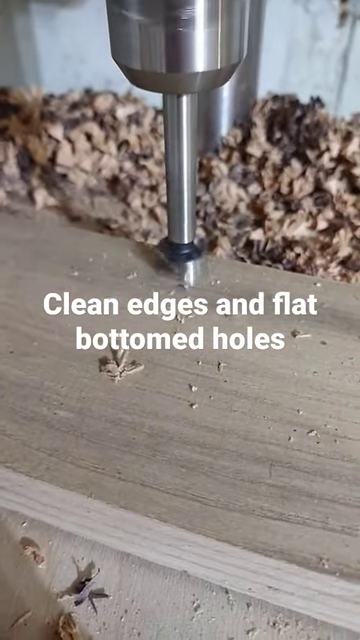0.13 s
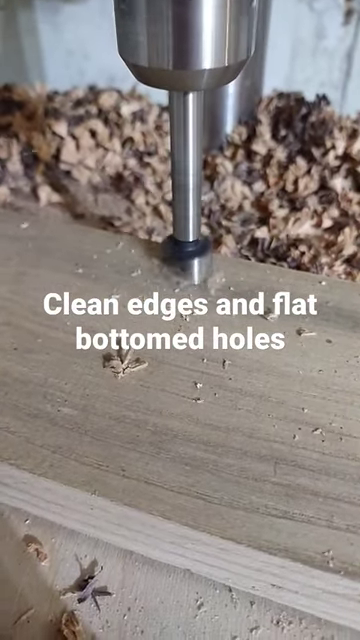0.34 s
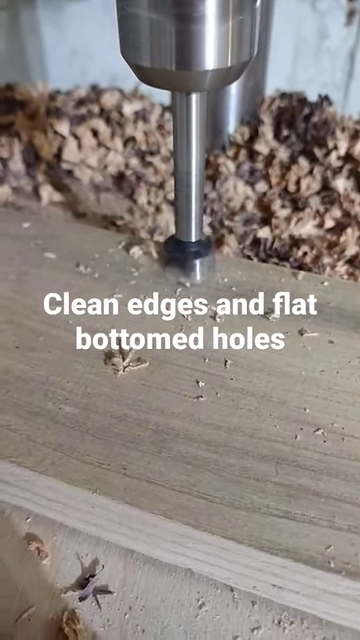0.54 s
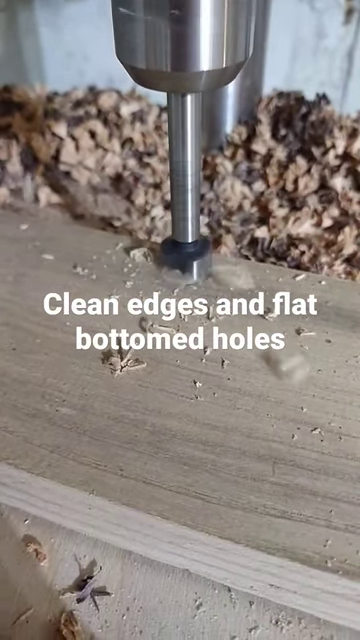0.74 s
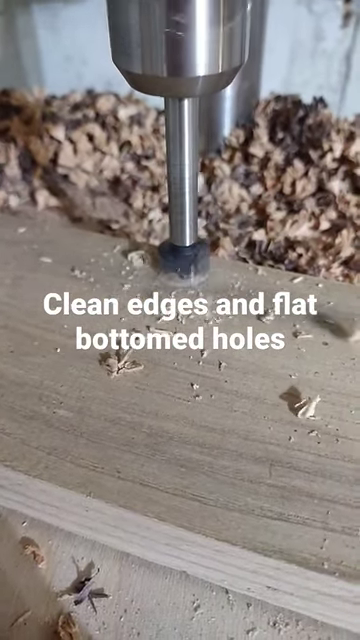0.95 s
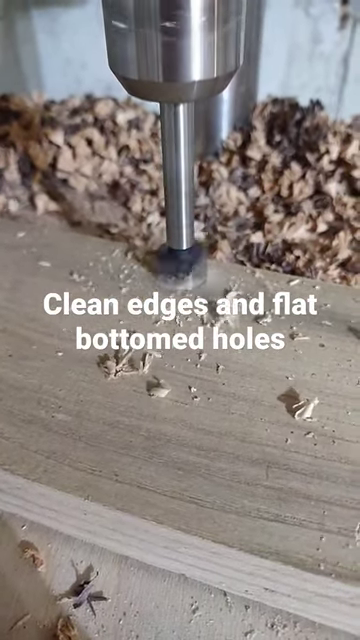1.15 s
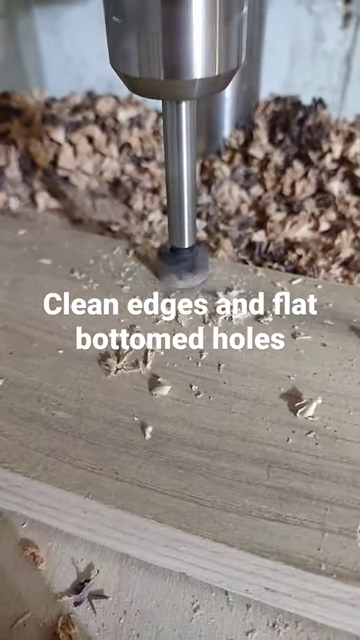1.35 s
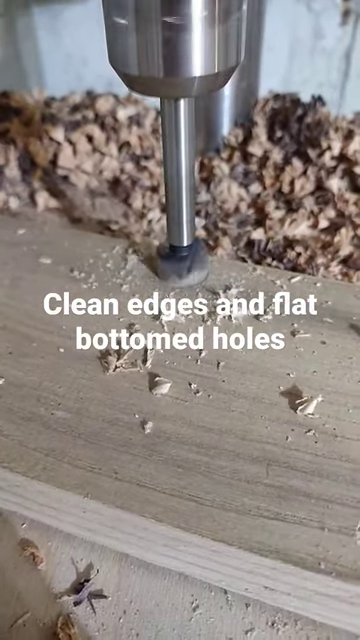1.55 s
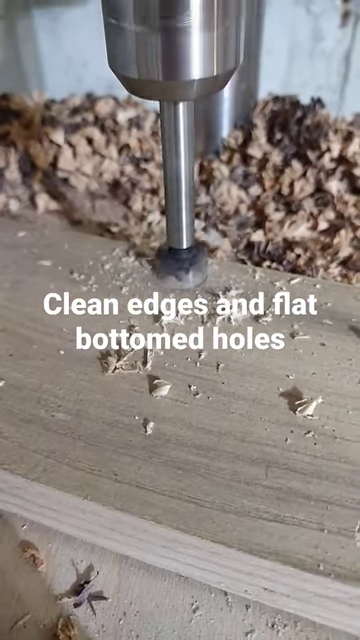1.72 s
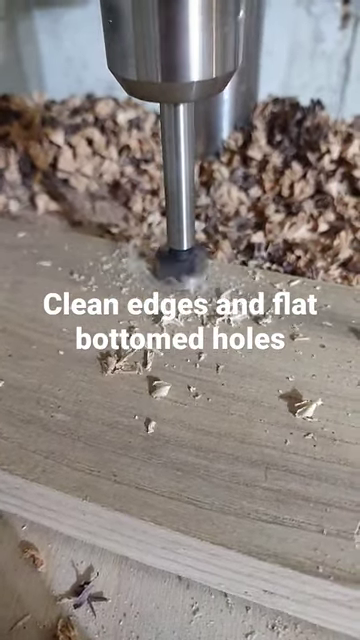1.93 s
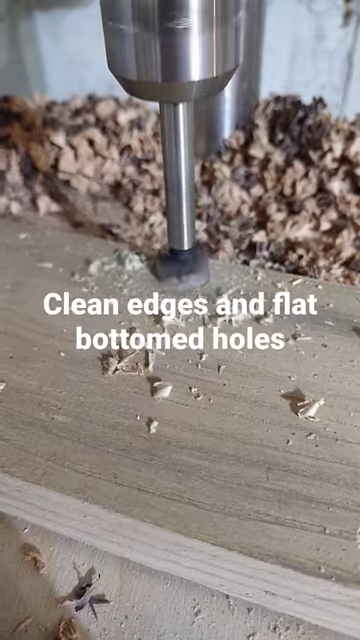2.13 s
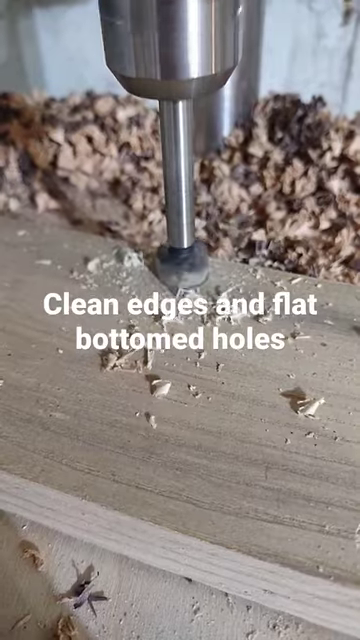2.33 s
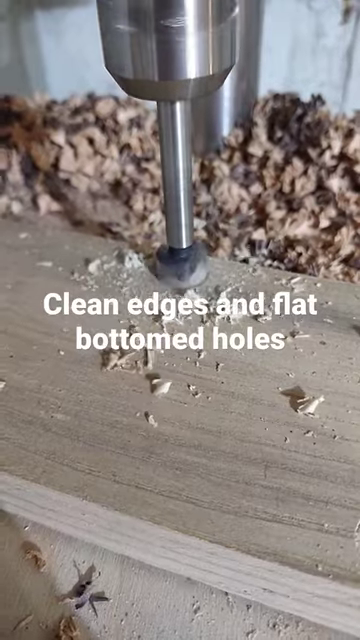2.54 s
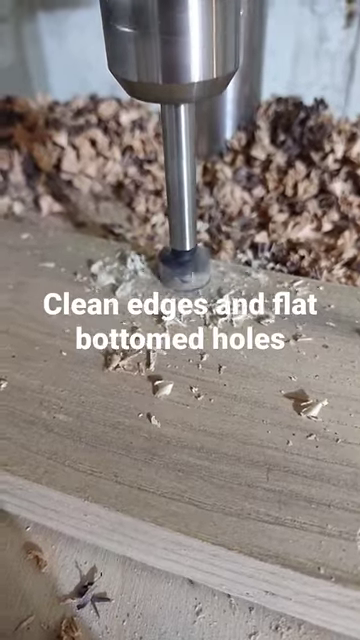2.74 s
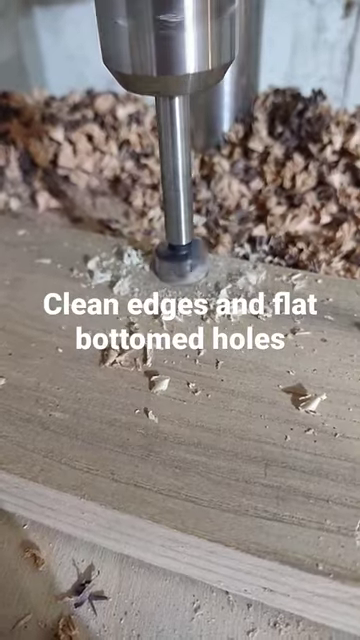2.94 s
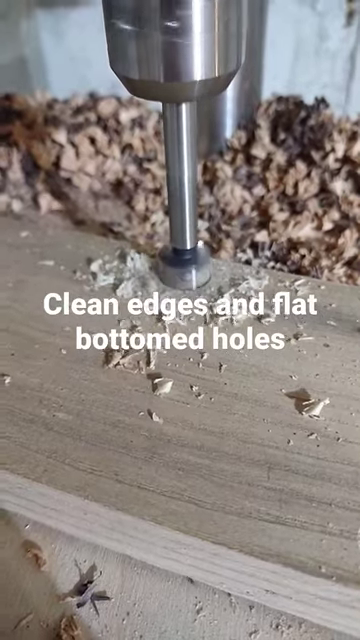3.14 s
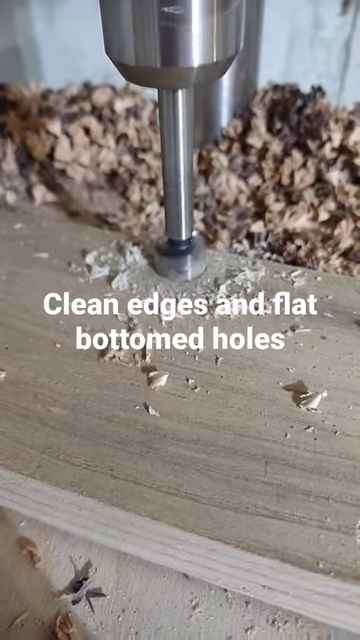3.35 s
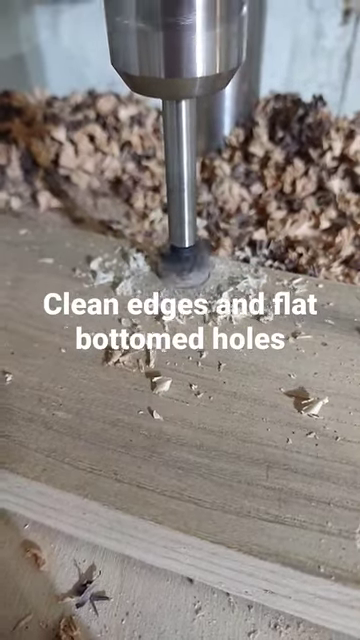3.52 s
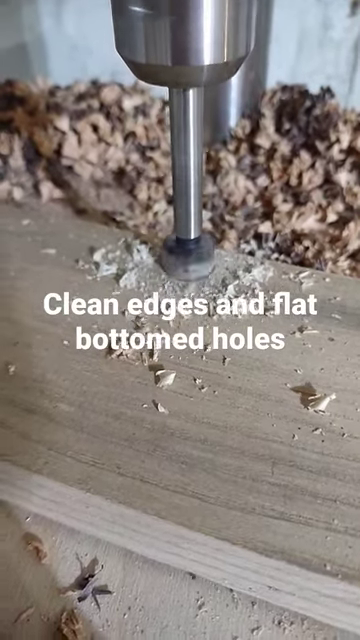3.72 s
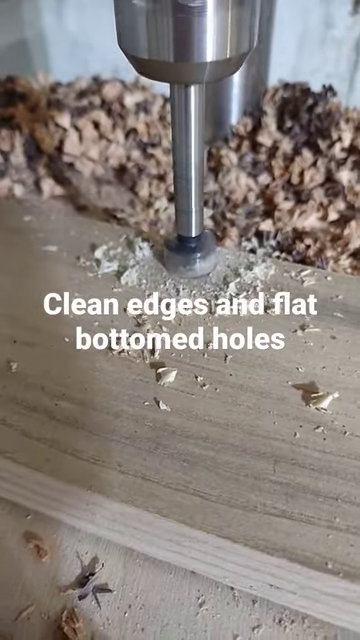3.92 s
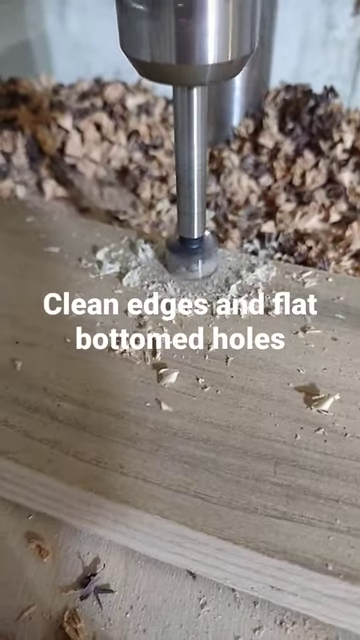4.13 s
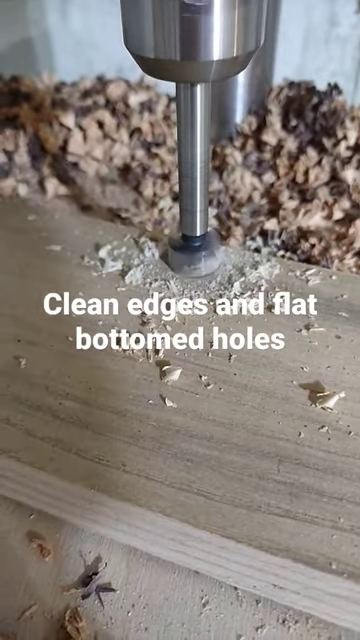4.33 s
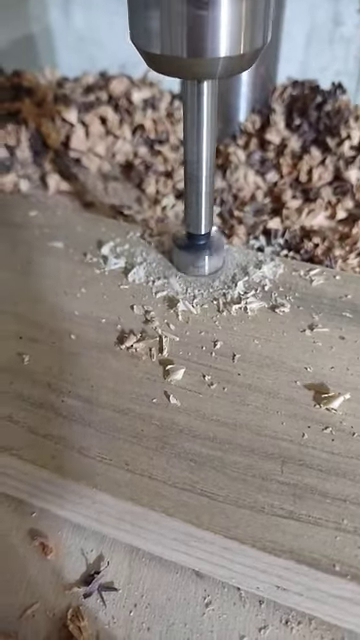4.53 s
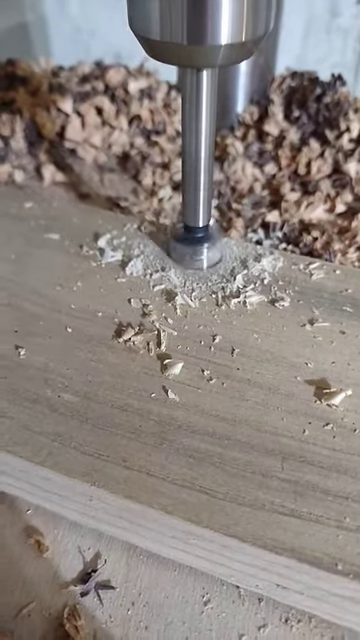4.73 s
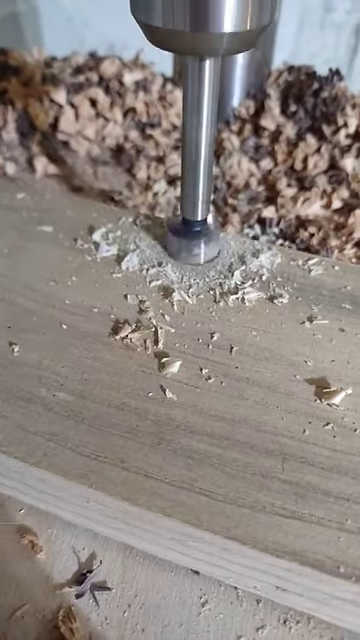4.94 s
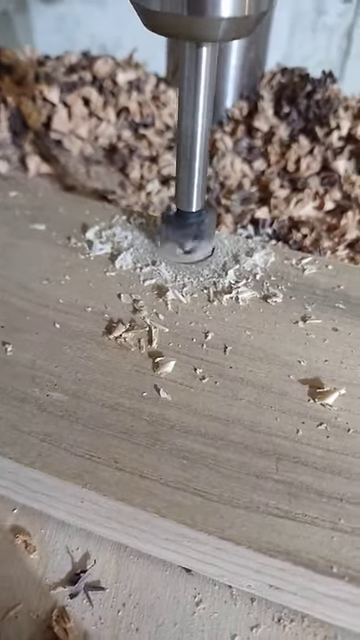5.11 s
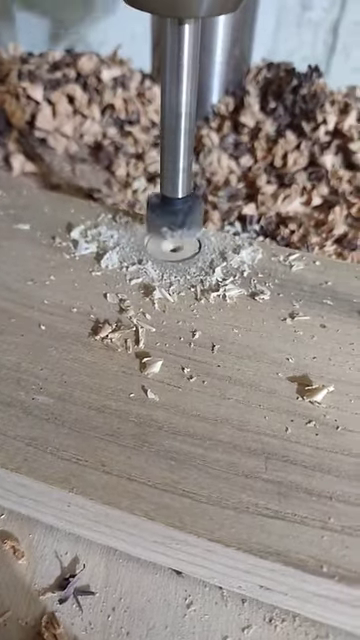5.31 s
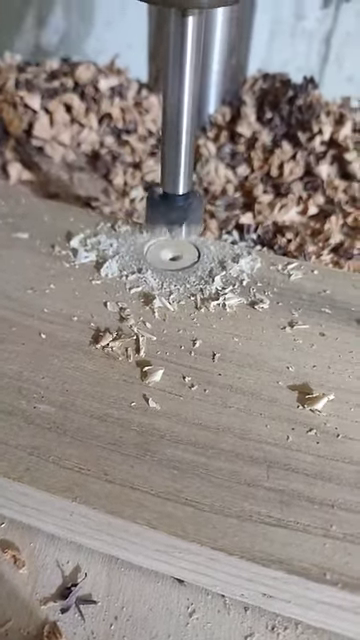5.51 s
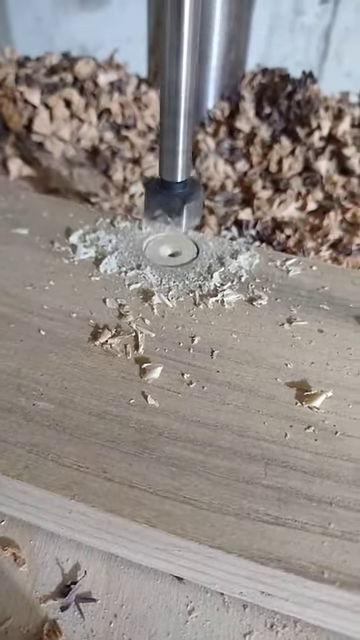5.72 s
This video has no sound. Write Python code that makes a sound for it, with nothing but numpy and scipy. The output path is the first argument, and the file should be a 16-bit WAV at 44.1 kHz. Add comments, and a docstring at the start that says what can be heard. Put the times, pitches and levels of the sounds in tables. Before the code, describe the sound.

Close to the microphone, a spinning drill bit bites into wood, scraping in rapid, even pulses over a vibrating drone. The steel rings and squeals more steadily as it sinks in. Near the end the whine dips in pitch and cuts off as the bit withdraws, leaving the softer hum of the idling drill press, light ticks of chips and a short clunk, with little echo from the workshop.

```python
"""A close, throbbing thrum and rasp: a drill press bores a flat-bottomed hole in a board, in a workshop.
At about 12 turns a second, the feed force thrums through the table and the edge rasps across end grain
twice a turn. The rim rubs the wall and rings the shank, squealing more as the hole deepens.
Near 5 s the bit lifts: the motor idles, loose chips tick and play in the feed knocks the housing."""
import sys
import numpy as np
from scipy import signal
from scipy.fft import rfft, irfft
from scipy.io import wavfile
from scipy.ndimage import uniform_filter1d, map_coordinates

SR = 44100
rng = np.random.default_rng(int(sys.argv[2]) if len(sys.argv) > 2 else 0)


def store_pcm(level_fs):
    """Save levels as 16-bit WAV."""
    pcm = np.round(np.clip(level_fs, -1, 1) * 32767).astype(np.int16)
    wavfile.write(sys.argv[1], SR, np.atleast_2d(pcm).T)


N = 254445
T = np.arange(N) / SR
HZ = np.fft.rfftfreq(N, 1 / SR)

# spindle speed, sagging under load: time_s, turns_per_s
SPINDLE_SPEED = [(0.0, 12.205), (0.5, 12.192), (0.9, 12.155), (1.6, 12.241), (2.6, 12.265), (3.4, 12.298),
                 (4.7, 12.306), (5.2, 12.35)]
# feed force harmonics, bit entering and deep: spindle_order, level_db
FORCE_ENTERING = [(1, -46), (2, -48), (3, -39), (4, -33), (5, -32), (6, -15), (7, -18.5), (8, -18),
                  (9, -33), (10, -10.5), (11, -13), (12, -5), (13, -7.5), (14, 1), (15, -18), (16, -10.5),
                  (17, -16.5), (18, -51)]
FORCE_DEEP = [(1, -36), (2, -45), (3, -40), (4, -28), (5, -43), (6, -13.5), (7, -26), (8, -2), (9, -0.5),
              (10, -6), (11, -11), (12, -1.5), (13, -9.5), (14, 0), (15, -57), (16, -10.5), (17, -41),
              (18, -28)]
# resonances of shank, cutting head, edge, board, steel table: freq_hz, width_hz, entering_db, deep_db
SHANK_MODES = [(1962, 104, -4.5, -6), (2153, 143, 0.5, -0.5), (2215, 69, -3.5, -4.5), (2315, 61, -3.5, -10),
               (2378, 423, -13.5, -13.5)]
HEAD_MODES = [(3190, 258, -0.5, -1.5), (3563, 360, -3.5, -3), (4006, 270, -0.5, -5),
              (4350, 420, -13, -15.5), (4757, 315, -8.5, -10.5), (5606, 685, -11.5, -12),
              (5860, 582, -12.5, -30), (7050, 140, -29, -24), (7830, 930, -20.5, -23.5),
              (8830, 490, -21, -23), (9970, 920, -24.5, -27.5), (10780, 7500, -27, -33),
              (11150, 590, -20, -25.5), (12500, 460, -24, -26), (13282, 643, -26, -27),
              (14363, 478, -24, -27), (15029, 890, -23, -27)]
SQUEAK_MODES = [(8980, 300, -2, 2), (10500, 600, 0, -2.5), (12750, 400, -1, -2), (14700, 900, -5, -6)]
BOARD_MODES = [(1120, 148, -11.5, -7), (1460, 220, -15.5, -13.5), (1608, 59, -15, -20)]
TABLE_MODES = [(364, 33, -13, -12), (424.3, 93, -1.5, -6), (596.5, 115, -10, -7.5),
               (752, 115, -18.5, -12.5)]
# where the edge bites end grain and the rim rubs the wall: angle_turns, width_turns, entering_db, deep_db
EDGE_BITES = [(0.081, 0.07, 9, 5), (0.593, 0.074, 9, 2.5), (0.53, 0.028, -1.5, 4)]
RIM_RUBS = [(.08, 0.14, 8, 7), (.36, 0.062, 3.5, 3), (.52, 0.045, 6.5, 9.5), (0.622, 0.066, 9.5, 4.5),
            (.8, 0.044, 3, 8), (.89, 0.049, 4, 2)]
# feed knocks as the spindle rises: start_s, level_db
FEED_KNOCKS = [(5.161, -28.5), (5.6428, -18.5), (5.647, -17.5), (5.663, -21)]
# housing resonances: freq_hz, level_db, t60_s
HOUSING_MODES = [(376, 6, 0.18), (451, 5, 0.19), (606, 3, 0.14), (1125, -1.5, 0.14), (1293, -0.5, 0.19),
                 (1660, -12, .08), (2010, -11, .08), (2340, -12, .06), (3386, -24, .06)]
# spectrum of a knock's crack: freq_hz, level_db
CRACK_SPECTRUM = [(40, -40), (150, -13), (450, 10), (900, -14), (1500, 4), (3000, -13), (5000, -28),
                  (7000, -40), (15000, -49)]
# chips flicked off the bit: start_s, level_db, t60_s
CHIP_TICKS = [(1.745, -33, 0.022), (5.372, -48, .15), (5.44, -47, .15), (5.52, -47, .04),
              (5.539, -27, 0.066), (5.577, -28, 0.018)]
# spectrum of a chip's tick: freq_hz, level_db
CHIP_SPECTRUM = [(300, -24), (1200, 2.5), (2600, 0), (4000, -15), (7000, -20), (15000, -19)]
# motor hum: pitch_hz, level_db
HUM_TONES = [(120, -36), (171, -40.5), (240.3, -36), (360.5, -45.5), (393, -41.5), (571, -44.5), (980, -49),
             (1970, -51.5), (2090, -60), (2449, -56), (4640, -77)]
# spectrum of belt and bearings: freq_hz, level_db
RUMBLE_SPECTRUM = [(30, -28), (75, -14), (110, 0), (135, -14.5), (165, 3.5), (215, -2.5), (280, -7),
                   (390, 1), (500, -12), (600, -7), (900, -19.5), (1150, -13), (1800, -22.5), (2900, -27.5),
                   (3500, -43), (4300, -40), (6500, -52), (15500, -54)]
# rumble swells as the spindle rises: centre_s, sigma_s, gain_db
RUMBLE_SWELLS = [(5.37, 0.015, 2.5), (5.76, .04, 3)]

# voices of the cut: entering_db, rim_in_db, buried_db, stage_lag_s, db_per_pressure_db
THRUM_LEVEL = (-16.7, -20.5, -24, 0.15, 1.02)
WHINE_LEVEL = (-19, -21.2, -18.2, -0.44, 0.95)
RASP_LEVEL = (-23, -26.8, -25.3, -0.06, 0.99)
TABLE_LEVEL = (-23.6, -24.3, -25.5, 0.3, 0.72)
BOARD_LEVEL = (-26, -28, -25.5, 0.17, 1.15)
SQUEAK_LEVEL = (-46, -44, -47.5, 0, 3)

TOUCH_DB, PRESS_S, EASE_S, EASE_DB_PER_S = 11, 0.5, 4.85, 68  # hand on the feed
RIM_IN_S, RIM_FADE_S, BURIED_S, BURIED_FADE_S = 1.41, 0.29, 3.38, 0.35  # stages of the hole
OFF_FLOOR_S, OFF_WALL_S, OFF_CHIPS_S = 4.99, 5.068, 5.185  # bit withdraws


def thrum(turns, depth, push_turns=0.4514, throb_db=4.8, seating_s=0.6):
    """The uneven floor of the hole pushes the table in the same pattern every turn."""
    force = np.zeros(N, complex)
    angle_turns = turns - push_turns
    touch_db = np.maximum(pressure_db(), -TOUCH_DB)
    for (order, entering_db), (_, deep_db) in zip(FORCE_ENTERING, FORCE_DEEP):
        # bending waves disperse, smearing each push
        lag_cycles = 0.018 * (order - 12) ** 2 + 0.15 * rng.standard_normal() + 0.022 * wander(2.1)
        size = blend(gain_of(entering_db), gain_of(deep_db), depth)
        size *= gain_of(0.16 * (order - 10) * touch_db)  # a light touch favours low orders
        size *= 1 + 0.19 * wander(4.2)
        force += size * np.exp(2j * np.pi * (order * angle_turns + lag_cycles))
    # wood yields to the hardest pushes
    force = force.real / uniform_filter1d(abs(force) + 1e-6, size=700) ** 0.37
    # on entry the rim bears on one side: one throb a turn
    force *= gain_of(throb_db * np.exp(-T / seating_s) * np.cos(2 * np.pi * angle_turns))
    return levelled(force) * gain_of(voice_db(THRUM_LEVEL)) * until(OFF_FLOOR_S, 0.05)


def whine(turns, depth, squeal_hz=2165, squeal_share=0.8):
    """The rim sticks and slips on the wall and rings the shank; with depth it locks into a squeal."""
    force = gain_of(at_angles(turns, RIM_RUBS, depth) + 1.1 * roughness(turns, memory=0.95, points=24))
    friction = roughness(turns, memory=0.63, points=3600) * force
    shank = levelled(ring(friction, SHANK_MODES, depth))
    pitch_hz = squeal_hz * (1 + 0.007 * roughness(turns, memory=0.8, points=12))
    squeal = unit_rms(force * np.sin(2 * np.pi * np.cumsum(pitch_hz) / SR))
    steel = levelled(shank + squeal_share * depth * squeal)
    return steel * gain_of(voice_db(WHINE_LEVEL)) * until(OFF_WALL_S, 0.012)


def rasp(turns, depth, bite_db, snaps_per_s=1500, fizz_hz=6400):
    """Fibres scrape and snap at the edge, most across end grain; a light touch sounds duller."""
    snaps = (rng.random(N) < snaps_per_s / SR) * rng.choice([-1, 1], N)
    snaps = snaps * gain_of(3.2 * np.minimum(rng.exponential(1, N), 4))
    tearing = roughness(turns, memory=0.55, points=7200) + 0.5 * unit_rms(snaps)
    tearing *= gain_of(bite_db + 1.14 * roughness(turns, memory=0.98, points=36))
    scrape = cutting_head(tearing, depth)
    level_db = voice_db(RASP_LEVEL)
    fizz = signal.sosfiltfilt(signal.butter(6, fizz_hz, "high", fs=SR, output="sos"), scrape)
    fizz_db = 0.25 * np.minimum(level_db + 20, 0) + 1.13 * roughness(turns, memory=0.89, points=14)
    return (scrape + fizz * (gain_of(fizz_db) - 1)) * gain_of(level_db) * rim_contact()


def cutting_head(force, depth, free_width_ratio=0.61):
    """Wood damps the head; under a light touch it rings more freely."""
    lightness = np.clip(-pressure_db() / TOUCH_DB, 0, 1)
    free_modes = [(hz, width_hz * free_width_ratio, *levels) for hz, width_hz, *levels in HEAD_MODES]
    return levelled(blend(ring(force, HEAD_MODES, depth), ring(force, free_modes, depth), lightness))


def rim_contact(graze_db=-12):
    """The rim leaves the wall, then briefly grazes loose chips."""
    leave_s = OFF_WALL_S - 0.008
    graze = until(OFF_CHIPS_S, 0.01) - until(leave_s, 0.011)
    return until(leave_s, 0.0082) + gain_of(graze_db) * graze


def chop(first=1.48, steady=0.63, peak_s=0.46, settle_s=0.35):
    """Bite strength: hardest as the edge breaks the surface, then even shaving."""
    settling = np.exp(-np.maximum(T - peak_s, 0) / settle_s)
    return np.minimum(T / peak_s, 1) ** 1.5 * blend(steady, first, settling)


def pitch_sag(steel, fraction, centre_s=4.95, fade_s=0.071):
    """The steel's pitch drops as pressure comes off the bit."""
    lag_samples = np.cumsum(fraction * (1 - until(centre_s, fade_s)))
    return map_coordinates(steel, [np.arange(N) - lag_samples], order=3)


def table_growl(turns, depth, catch_s=1.16, catch_db=3.5):
    """The edge bumps over fibres and rings the table, most as the rim first catches."""
    bumps = roughness(turns, memory=0.64, points=900)
    bumps *= gain_of(1.83 * roughness(turns, memory=0.75, points=40))
    level_db = voice_db(TABLE_LEVEL) + catch_db * swell(catch_s, 0.19)
    return levelled(ring(bumps, TABLE_MODES, depth)) * gain_of(level_db) * until(OFF_WALL_S, 0.048)


def board_knocks(turns, depth, bite_db, ridge_turns=0.576, hard_grain_s=2.35):
    """Bites knock the board; once the rim is in, a ridge jolts the edge each turn, most in hard grain."""
    hard_grain = swell(hard_grain_s, 0.3)
    jolt_db = staged(0, 5, 5) + 5.5 * hard_grain
    force_db = 0.76 * bite_db + jolt_db * pulse(turns, ridge_turns, 0.039)
    bumps = roughness(turns, memory=0.59, points=1800)
    bumps *= gain_of(force_db + 0.89 * roughness(turns, memory=0.98, points=40))
    level_db = voice_db(BOARD_LEVEL) + 2.5 * hard_grain
    return levelled(ring(bumps, BOARD_MODES, depth)) * gain_of(level_db) * until(OFF_FLOOR_S, 0.068)


def squeaks(turns, depth):
    """The edge squeaks thinly on burnished fibres at the height of each bite."""
    force_db = 18 * at_angles(turns, [(0.115, 0.065, 1, 0.78), (0.59, 0.07, 0.57, 0.82)], depth)
    friction = rng.standard_normal(N) * gain_of(force_db)
    return levelled(ring(friction, SQUEAK_MODES, depth)) * gain_of(voice_db(SQUEAK_LEVEL))


def feed_knocks(crack_db=-3, ring_db=-8, low_cut_hz=230):
    """Play in the feed knocks the housing: a short crack and its ring, with little bass."""
    cracks = sum(gain_of(db) * burst(start_s, t60_s=0.1) for start_s, db in FEED_KNOCKS)
    out = gain_of(crack_db) * coloured(cracks, CRACK_SPECTRUM)
    t = T[:SR // 2]
    for start_s, knock_db in FEED_KNOCKS:
        housing = sum(gain_of(db - 60 * t / t60_s) * np.sin(2 * np.pi * hz * t) * rng.choice([-1, 1])
                      for hz, db, t60_s in HOUSING_MODES)
        part = out[round(start_s * SR):][:len(t)]
        part += gain_of(knock_db + ring_db) * housing[:len(part)]
    return signal.sosfilt(signal.butter(2, low_cut_hz, "high", fs=SR, output="sos"), out)


def chips():
    """Loose chips tick against the board."""
    ticks = sum(gain_of(db) * burst(start_s, t60_s) for start_s, db, t60_s in CHIP_TICKS)
    return coloured(ticks, CHIP_SPECTRUM)


def motor(turns, rumble_db=-29):
    """Mains hum and steady tones over the fluttering rumble of belt and bearings."""
    hum = np.zeros(N)
    for hz, db in HUM_TONES:
        amplitude = np.sqrt(2) * gain_of(db + 0.52 * wander(3))
        hum += amplitude * np.sin(2 * np.pi * hz * T + 0.18 * wander(3))
    flutter = roughness(turns, memory=0.67, points=7200) * gain_of(0.46 * wander(57))
    swell_db = sum(db * swell(centre_s, sigma_s) for centre_s, sigma_s, db in RUMBLE_SWELLS)
    return hum + levelled(coloured(flutter, RUMBLE_SPECTRUM)) * gain_of(rumble_db + swell_db)


def workshop(x, t60_s=0.13, wet_db=-15.5):
    """Nearby walls add a short tail."""
    t = T[:SR // 2]
    tail = rng.standard_normal(len(t)) * gain_of(-60 * t / t60_s) * (t > 0.003)
    return x + gain_of(wet_db) * signal.fftconvolve(x, tail / np.linalg.norm(tail))[:N]


def pressure_db():
    """Feed pressure: builds, holds at 0 dB, is let off."""
    return -TOUCH_DB * np.maximum(1 - T / PRESS_S, 0) ** 1.56 - EASE_DB_PER_S * np.maximum(T - EASE_S, 0)


def staged(entering, rim_in, buried, lag_s=0):
    """Glides between three values as the rim, then the whole head, sinks in."""
    return (entering + (rim_in - entering) * (1 - until(RIM_IN_S + lag_s, RIM_FADE_S))
            + (buried - rim_in) * (1 - until(BURIED_S + lag_s, BURIED_FADE_S)))


def hole_depth(lag_s=0):
    """0 entering, 1 buried."""
    return np.clip(staged(0, 0.68, 1, lag_s), 0, 1)


def voice_db(level):
    """A voice follows hole stage and feed pressure."""
    *stages_db, lag_s, db_per_pressure_db = level
    return staged(*stages_db, lag_s) + db_per_pressure_db * pressure_db()


def roughness(turns, memory, points):
    """Random surface, `points` per turn; each pass leaves the share `memory` for the next."""
    fresh = rng.standard_normal((int(turns[-1]) + 40, points))
    surface = signal.lfilter([np.sqrt(1 - memory ** 2)], [1, -memory], fresh, axis=0)[30:].ravel()
    return unit_rms(np.interp(turns * points, np.arange(len(surface)), surface))


def pulse(turns, angle_turns, width_turns):
    """One Gaussian hump a turn."""
    offset_turns = (turns - angle_turns + 0.5) % 1 - 0.5
    return np.exp(-(offset_turns / width_turns) ** 2 / 2)


def at_angles(turns, spots, depth):
    """Humps at fixed angles of each turn; heights shift with depth."""
    return sum(blend(entering, deep, depth) * pulse(turns, angle, width)
               for angle, width, entering, deep in spots)


def ring(force, modes, depth, size=8192):
    """Minimum-phase resonances whose strengths shift with depth."""
    hz, width_hz, *stages_db = np.transpose(modes)
    detune = 2 * (np.fft.rfftfreq(size, 1 / SR)[:, None] - hz) / width_hz
    peaks = 1 / (1 + detune ** 2) ** 2
    stages = []
    for db in stages_db:
        cepstrum = irfft(np.log(peaks @ gain_of(db) ** 2 + 1e-12))[:size // 2]
        impulse = irfft(np.exp(rfft(cepstrum, size) - cepstrum[0] / 2))
        stages.append(unit_rms(signal.oaconvolve(force, impulse)[:N]))
    return blend(*stages, depth)


def coloured(x, spectrum):
    """Filters by a spectral shape at unit RMS gain."""
    hz, db = np.transpose(spectrum)
    gain = gain_of(np.interp(np.log(HZ + 1), np.log(hz + 1), db))
    return irfft(rfft(x) * unit_rms(gain), N)


def wander(rate_hz, size=4096):
    """Random drift, unit RMS."""
    low_pass = np.exp(-(np.fft.rfftfreq(size, T[-1] / size) / rate_hz) ** 2)
    drift = irfft(rfft(rng.standard_normal(size)) * low_pass)
    return unit_rms(np.interp(T, np.linspace(0, T[-1], size), drift))


def levelled(x):
    """Unit power over about two turns; keeps the throb within each."""
    return x / np.sqrt(uniform_filter1d(x ** 2, size=7200) + 1e-12)


def burst(start_s, t60_s):
    return rng.standard_normal(N) * (T >= start_s) * gain_of(-60 * np.maximum(T - start_s, 0) / t60_s)


def until(end_s, fade_s):
    return (1 - np.tanh((T - end_s) / fade_s)) / 2


def swell(centre_s, sigma_s):
    return np.exp(-((T - centre_s) / sigma_s) ** 2 / 2)


def blend(a, b, share):
    return (1 - share) * a + share * b


def unit_rms(x):
    return x / np.sqrt(np.mean(x ** 2) + 1e-20)


def gain_of(db):
    return 10 ** (np.asarray(db) / 20)


def scene():
    """One hole, mono; spindle angle and depth drive the cut."""
    turns = np.cumsum(np.interp(T, *np.transpose(SPINDLE_SPEED))) / SR
    depth = hole_depth()
    bite_db = chop() * at_angles(turns, EDGE_BITES, depth)
    near = pitch_sag(whine(turns, depth), 0.07) + pitch_sag(rasp(turns, depth, bite_db), 0.031)
    near += squeaks(turns, depth) + table_growl(turns, depth) + board_knocks(turns, depth, bite_db)
    near += chips() + feed_knocks()
    return (thrum(turns, hole_depth(lag_s=0.15)) + motor(turns) + workshop(near))[None]


def record(dry):
    """Steep low-pass at 15.6 kHz."""
    return signal.oaconvolve(dry, signal.firwin(511, 15600, window=("kaiser", 9), fs=SR)[None], "same")


dry = scene()
out = record(dry)
store_pcm(out)
```